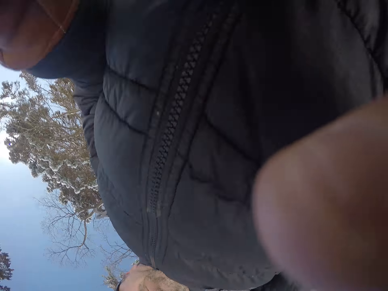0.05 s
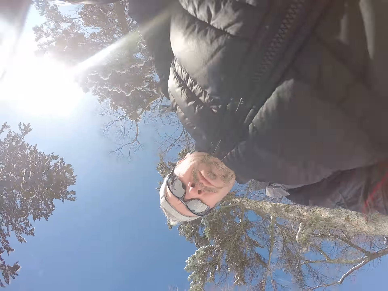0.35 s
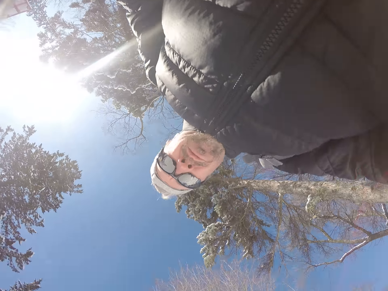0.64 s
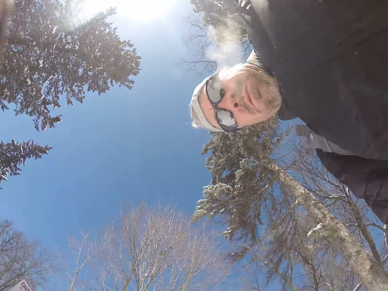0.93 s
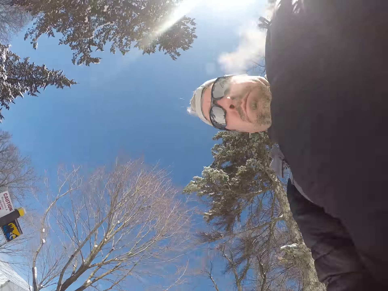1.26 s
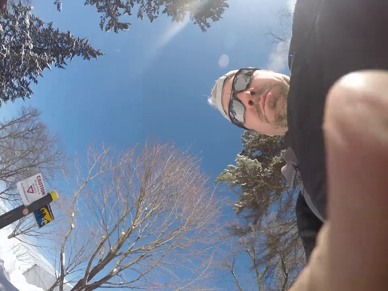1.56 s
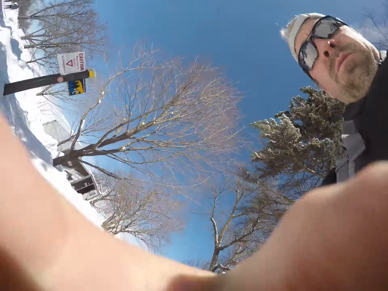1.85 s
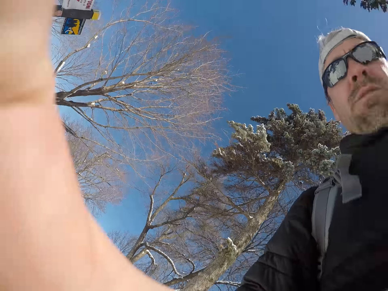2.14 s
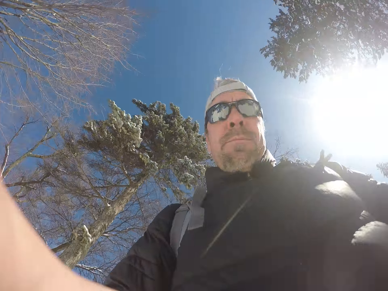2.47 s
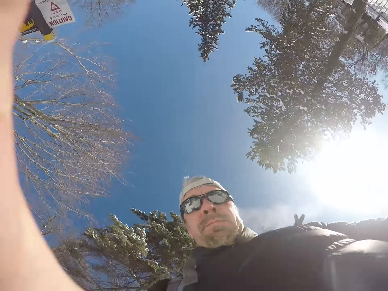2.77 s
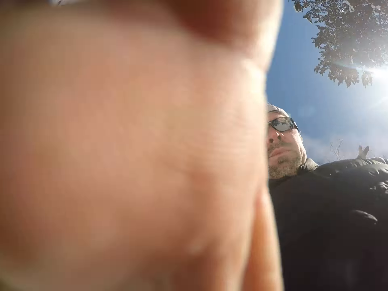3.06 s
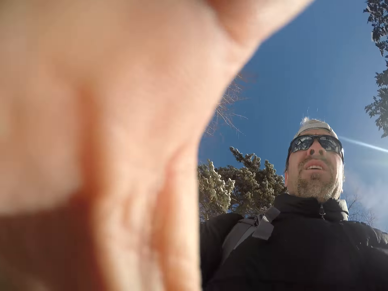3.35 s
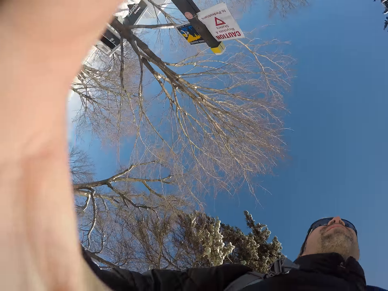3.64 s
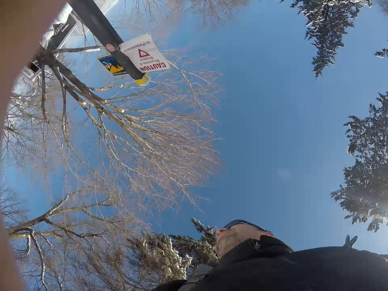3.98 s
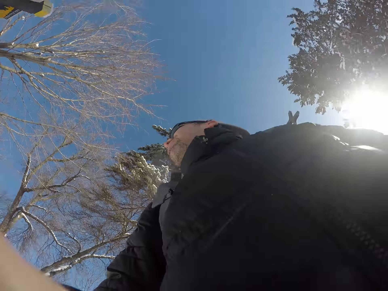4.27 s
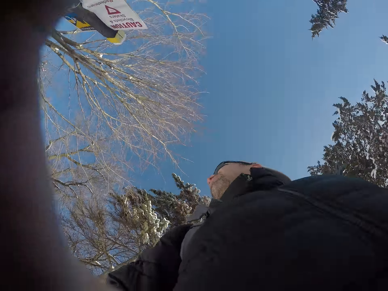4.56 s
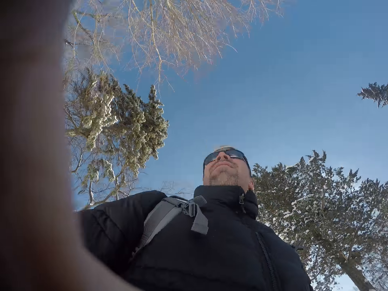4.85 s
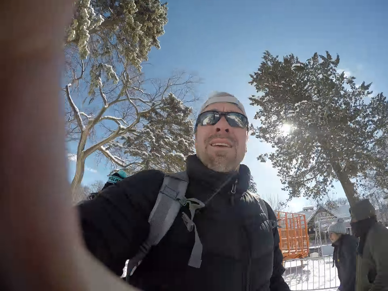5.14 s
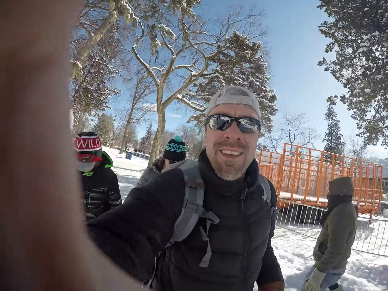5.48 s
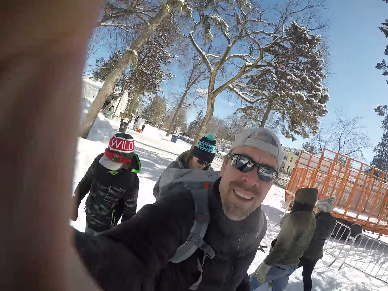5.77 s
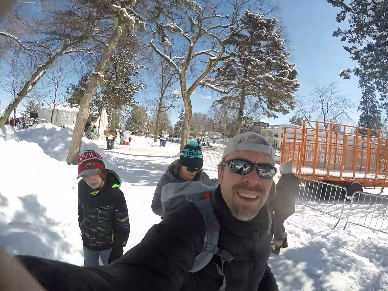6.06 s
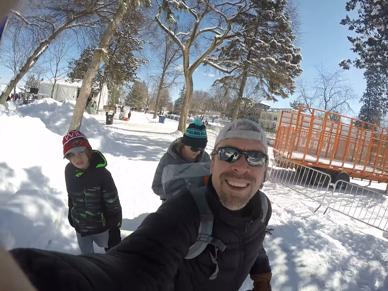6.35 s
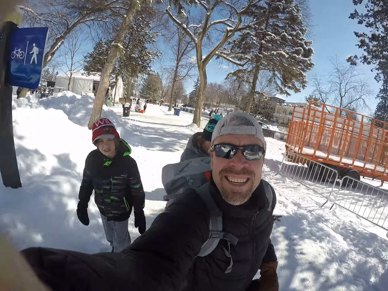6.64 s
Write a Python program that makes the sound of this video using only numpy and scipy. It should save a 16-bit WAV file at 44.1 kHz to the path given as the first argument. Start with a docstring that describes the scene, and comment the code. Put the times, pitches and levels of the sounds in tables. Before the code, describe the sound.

Close, dry handling noise leads throughout: fingers and jacket fabric rub, knock and squeak on a camera case, and each shove thumps the microphone. Softer, irregular footsteps crunch through packed snow outdoors, with a lumpy wind rumble below. The scraping is strongest around the middle, where a few dull fingertip pops come in. It then thins out and finishes with the case creaking in a tightened grip.

```python
"""Outdoors on packed snow: someone walks while turning a small camera over in one hand.
Wind rumbles at the microphone; the snow breaks under the boots in clumps of small cracks.
Skin and a padded jacket rub, squeak and knock on the case; each shove thumps the microphone.
A shifting fingertip pops dully, and at the end the case creaks in the tightened grip."""
import sys
import numpy as np
from scipy import signal
from scipy.fft import rfft, irfft
from scipy.io import wavfile
from scipy.ndimage import uniform_filter1d

SR = 44100
rng = np.random.default_rng(int(sys.argv[2]) if len(sys.argv) > 2 else 0)


def persist_wave(psi):
    """Save psi, clipped to +-1, as 16-bit WAV."""
    counts = np.round(np.clip(psi, -1, 1) * 32767).astype(np.int16)
    wavfile.write(sys.argv[1], SR, np.atleast_2d(counts).T)


N = 295894
TIME_S = np.arange(N) / SR
FREQS_HZ = np.fft.rfftfreq(4096, 1 / SR)

# camera shell response to knocks and squeaks: f/Hz, relative level/dB
SHELL_SPECTRUM = [(100, 9.5), (450, -5.5), (1000, -0.5), (1800, 0.5), (4100, -2.5), (4700, -10.5),
                  (5500, -17), (11000, -19.5), (15000, -31)]


def gain_of(db):
    """Decibels to amplitude."""
    return 10 ** (np.asarray(db) / 20)


def unit_rms(x):
    """Scale to rms 1."""
    return x / np.sqrt(np.mean(x ** 2) + 1e-20)


def unit_peak(x):
    """Scale to peak 1."""
    return x / (abs(x).max() + 1e-20)


def spectrum_db(points, hz=FREQS_HZ):
    """Spectrum interpolated on a log-frequency axis."""
    points_hz, db = np.transpose(points)
    return np.interp(np.log(hz + 1), np.log(points_hz), db)


def curve_db(points):
    """Level curve interpolated at every sample."""
    times_s, db = np.transpose(points)
    return np.interp(TIME_S, times_s, db)


def add(mix, start_s, sound):
    """Add a sound to the mix in place."""
    part = mix[max(round(start_s * SR), 0):][:len(sound)]
    part += sound[:len(part)]


def resonance_db(hz, width_hz, lift_db):
    """Bell-shaped lift over frequency."""
    return lift_db / (1 + (2 * (FREQS_HZ - hz) / width_hz) ** 2)


def colour(x, db):
    """Minimum-phase filter with the given gain over frequency."""
    log_gain = np.log(gain_of(np.r_[db, db[-2:0:-1]]))
    response = np.exp(np.conj(signal.hilbert(log_gain)))
    taps = np.fft.ifft(response).real
    return signal.oaconvolve(x, taps[:len(FREQS_HZ)])[:len(x)]


def wander(corner_hz):
    """Low-passed noise, rms 1."""
    hz = np.fft.rfftfreq(N, 1 / SR)
    return unit_rms(irfft(rfft(rng.standard_normal(N)) / (1 + (hz / corner_hz) ** 2), N))


def grains(per_s, spread_db):
    """Random impulses, rms 1; with spread, many small and a few large."""
    size = gain_of(spread_db * np.minimum(rng.exponential(1, N), 4))
    return unit_rms(size * rng.choice([-1, 1], N) * (rng.random(N) < per_s / SR))


def contact(length_s, attack_s, release_s):
    """Time axis and trapezoid envelope of one contact."""
    t = np.arange(0, length_s, 1 / SR)
    return t, np.clip(np.minimum(t / attack_s, (length_s - t) / release_s), 0, 1)


def moving_contact(x, depth_db):
    """The contact spot moves, so patches of the spectrum swell and fade; output rms 1."""
    frames = signal.stft(x, nperseg=512, noverlap=384)[2]
    patches = rng.standard_normal(frames.shape)
    for _ in range(2):
        patches = uniform_filter1d(patches, size=4, axis=0)
        patches = uniform_filter1d(patches, size=14, axis=1)
    frames = frames * gain_of(depth_db * unit_rms(patches))
    return unit_rms(signal.istft(frames, nperseg=512, noverlap=384)[1][:N])


def wind(rub_level, trim_db=4, lump_db=2.4, swing_db_per_db=0.17):
    """Lumpy turbulence at the microphone port, stronger as the hand swings the camera."""
    # t/s, level before trim and swing/dB
    strength = [(0.0, -37), (0.95, -29), (1.9, -30), (2.35, -32.5), (2.9, -23.5), (3.15, -25.5),
                (3.3, -33.5), (3.75, -24.5), (4.25, -22), (4.65, -24), (4.98, -29), (5.7, -27.5),
                (6.35, -26), (6.48, -32.5)]
    # f/Hz, relative level/dB
    gust_spectrum = [(8, -7.5), (24, 4), (35, -5), (65, -8.5), (110, -20), (200, -33.5), (400, -37),
                     (3000, -66)]
    eddies = rng.standard_normal(N) * gain_of(lump_db * wander(corner_hz=27))
    response = gain_of(spectrum_db(gust_spectrum, np.fft.rfftfreq(N, 1 / SR)))
    rumble = irfft(rfft(eddies) * response, N)
    swing = unit_rms(uniform_filter1d(rub_level, size=2000)) ** swing_db_per_db
    return gain_of(curve_db(strength) + trim_db) * swing * unit_rms(rumble)


def boot_load(fade_db=9):
    """Crunch amplitude: the snow gives under each boot, then firms up."""
    # shuffling between steps: t/s, relative level/dB
    shuffle = [(0.5, -56), (1.05, -42), (1.6, -40), (2.1, -49.5), (2.6, -43.5), (3.6, -45), (5.0, -56),
               (5.4, -50), (6.7, -54)]
    # boots pressing in: start/s, length/s, relative level/dB
    presses = [(0.667, 0.18, -35.5), (0.929, 0.093, -31.5), (1.071, 0.083, -33), (1.187, 0.24, -35),
               (1.525, 0.14, -36), (2.441, 0.063, -30), (2.658, 0.043, -29.5), (2.846, 0.127, -35),
               (2.994, 0.095, -32), (3.229, 0.017, -31), (3.687, 0.024, -30), (3.755, .07, -28),
               (3.98, 0.13, -36), (4.283, 0.066, -31), (4.531, 0.084, -36), (4.736, 0.072, -31.5),
               (5.195, 0.077, -42.5), (5.418, 0.098, -40), (5.819, 0.047, -33), (5.872, 0.058, -30.5),
               (6.033, 0.12, -36), (6.318, 0.03, -37.5)]
    power = gain_of(curve_db(shuffle)) ** 2
    for start_s, length_s, db in presses:
        t, load = contact(length_s, attack_s=0.0074, release_s=0.0065)
        add(power, start_s, (load * gain_of(db - fade_db * t / length_s)) ** 2)
    return np.sqrt(power)


def snow_crunch(trim_db=4.5, clump_db=1.5):
    """Packed snow breaks under the boots in clumps of small cracks."""
    # f/Hz, relative level/dB
    snow_spectrum = [(100, 1), (250, -4), (520, -10), (750, 1.5), (1100, -2), (1500, 1.5), (2200, -5),
                     (4000, -13.5), (9000, -32)]
    cracks = grains(per_s=1000, spread_db=2.5) * gain_of(clump_db * wander(corner_hz=61))
    crunch = moving_contact(colour(cracks, spectrum_db(snow_spectrum)), depth_db=1)
    return boot_load() * gain_of(trim_db) * crunch


def fingertip_pops(start_hz=1000, end_hz=65, fall_s=0.003, decay_s=0.006):
    """Each pop drops in pitch and grows fuller as the fingertip settles."""
    # t/s, peak/dB
    pops = [(4.114, -24), (4.178, -22), (4.212, -20.5), (4.826, -31.5), (5.214, -31), (5.263, -27.5),
            (5.299, -30), (5.352, -26)]
    out, t = np.zeros(N), TIME_S[:SR // 10]
    hz = end_hz + (start_hz - end_hz) * np.exp(-t / fall_s)
    glide = np.sin(2 * np.pi * np.cumsum(hz) / SR)
    pop = unit_peak(glide * np.exp(-t / decay_s) / hz)
    for start_s, db in pops:
        add(out, start_s, gain_of(db) * pop)
    return out


def case_creak():
    """Strained plastic lets go in single ticks, all ringing alike."""
    # t/s, peak/dB
    slips = [(6.488, -21.5), (6.508, -17.5), (6.517, -20), (6.529, -19), (6.5544, -22), (6.567, -16),
             (6.5838, -12.5), (6.607, -18), (6.659, -15.5)]
    # f/Hz, relative level/dB, T60/s
    modes = [(1250, 10, 0.0049), (1770, 12, 0.0036), (2430, 4.5, 0.0087), (3130, 2.5, 0.0071),
             (3850, -4.5, 0.012), (5430, -11, 0.004)]
    out, t = np.zeros(N), TIME_S[:SR // 20]
    tick = sum((-1) ** k * gain_of(db - 60 * t / t60_s) * np.sin(2 * np.pi * hz * t)
               for k, (hz, db, t60_s) in enumerate(modes))
    for start_s, db in slips:
        add(out, start_s, gain_of(db) * unit_peak(tick))
    return out


def air_thumps(fade_cycles=0.28, sag_cycles=1.0):
    """A shove pushes air into the microphone; the pressure swing slows as it dies."""
    # t/s, peak/dB, initial f/Hz
    shoves = [(0.699, -12.5, 98), (0.915, -16.5, 52), (1.307, -3.5, 29.5), (1.396, -13, 42.3),
              (1.559, -13, 164), (1.583, -2.5, 68.5), (1.698, -11.5, 77), (1.823, -25, 165),
              (2.103, -5, 98), (2.454, -12.5, 55), (2.682, -12, 73), (3.05, -11.5, 115), (3.438, -1, 94),
              (4.126, -9, 51.6), (4.18, -13, 48), (4.391, -9, 75), (4.474, -0.5, 94), (4.83, -17, 45),
              (5.535, -13.5, 33), (5.712, -13.5, 50.5)]
    out, t = np.zeros(N), TIME_S[:SR // 5]
    for start_s, db, hz in shoves:
        cycles = hz * t
        swing = np.sin(2 * np.pi * sag_cycles * np.log1p(cycles / sag_cycles))
        envelope = cycles ** 2 * np.exp(-cycles / fade_cycles)
        add(out, start_s, gain_of(db) * unit_peak(swing * envelope))
    return out


def skin_squeaks(relative_width=0.34, lift_db=25):
    """Skin sticks and slips, locking briefly on to one resonance: bright scuffs to short squeaks."""
    # centre/s, rms at centre/dB, f/Hz, length/s
    squeaks = [(0.15, -34, 3900, 0.061), (0.483, -28, 3900, 0.036), (2.869, -23, 4160, 0.059),
               (2.957, -15.5, 1820, .03), (3.004, -16, 2220, 0.011), (3.029, -17, 2380, 0.039),
               (3.21, -26, 1820, 0.24), (3.436, -10, 1700, 0.00897), (3.559, -29.5, 3400, .07),
               (3.799, -10.5, 2040, 0.012), (3.80, -18, 3580, 0.012), (3.835, -10, 1970, 0.0061),
               (4.062, -29, 3970, 0.11), (4.362, -14, 1920, 0.033), (4.605, -15, 1770, 0.012),
               (5.584, -33.5, 3200, .1), (5.885, -21.5, 1450, 0.032)]
    out = np.zeros(N)
    for centre_s, db, hz, length_s in squeaks:
        shell_db = spectrum_db(SHELL_SPECTRUM) + resonance_db(hz, relative_width * hz, lift_db)
        chatter = colour(rng.standard_normal(SR), shell_db)
        arch = np.sqrt(signal.windows.hann(int(length_s * SR)))
        add(out, centre_s - length_s / 2, gain_of(db) * unit_rms(chatter[-len(arch):]) * arch)
    return out


def through_case(x, db):
    """Colour a sound and let it ring in the camera case."""
    # f/Hz, width/Hz, lift/dB
    modes = [(1640, 95, 2), (1900, 125, 3), (2505, 71, 3.5), (3410, 360, 2.5), (3900, 770, -2.5)]
    return colour(x, db + sum(resonance_db(*mode) for mode in modes))


def finger_knocks(rattle_gain=0.5, relative_width=0.74, lift_db=12):
    """A sharp contact and a brief rattle; the spot hit favours one band of the shell."""
    # t/s, peak/dB, favoured f/Hz, rattle decay/s
    knocks = [(0.929, -9, 2470, 0.0033), (1.248, -7.5, 2700, 0.0028), (1.305, -5.5, 1480, 0.0036),
              (1.588, 2.5, 4130, 0.0011), (1.696, -8.5, 4550, 0.0023), (2.102, -5.5, 2620, 0.00025),
              (2.102, -21, 1170, 0.0037), (2.615, -8, 2430, 0.00092), (3.061, -7, 1300, 0.0012),
              (3.077, -2, 1280, 0.0017), (3.389, -10, 2210, 0.0017), (3.394, -11, 2020, 0.00079),
              (3.428, -11, 960, 0.0032), (3.433, -1.5, 9500, 0.0032), (4.132, -1.5, 1160, 0.0018),
              (4.213, -13, 1850, 0.0013), (4.57, 1, 2670, 0.0011), (4.593, -10, 1330, 0.00071),
              (4.599, -11.5, 800, 0.0049), (4.801, -26, 1380, 0.0031), (5.541, -17.5, 6500, 0.0026),
              (5.608, -13.5, 1280, 0.0024), (5.675, -9, 1250, 0.00073), (5.676, -2, 3580, 0.00073),
              (5.700, -9, 1540, 0.0022), (6.05, -15, 1380, 0.015)]
    out, t = np.zeros(N), TIME_S[:len(FREQS_HZ)]
    impulse = t == 0
    for start_s, db, hz, decay_s in knocks:
        rattle = rattle_gain * rng.standard_normal(len(t)) * np.exp(-t / decay_s)
        shell_db = spectrum_db(SHELL_SPECTRUM) + resonance_db(hz, relative_width * hz, lift_db)
        add(out, start_s, gain_of(db) * unit_peak(through_case(impulse + rattle, shell_db)))
    return out


def hand_strokes(swell_db=7.5, fizz_swell_db=5, crest_exponent=0.82, fidget_db=2.34, grip_fizz_db=-14.5):
    """Rub and fizz amplitudes: each stroke speeds up and slows, louder and brighter with speed."""
    # faint rub of the shifting grip: t/s, level/dB
    grip = [(0.0, -41.5), (0.45, -39.5), (0.8, -28.5), (0.875, -40), (1.0, -40), (1.72, -32.5), (2.02, -39),
            (2.55, -38.5), (2.99, -28.5), (3.46, -28.5), (3.87, -41), (4.0, -33), (4.55, -27.5),
            (4.83, -45), (5.05, -49.5), (5.75, -42.5), (6.46, -45), (6.71, -60)]
    # start/s, length/s, rub at full speed/dB, fizz re rub before trim/dB, fastest point/fraction
    strokes = [(0.0, 0.04, -28, -15, 0), (0.124, 0.14, -28.5, -10, 0), (0.255, 0.15, -23.5, -5, 0.55),
               (0.47, 0.056, -27.5, -7.5, 0.12), (0.528, 0.11, -21, -3.5, 0.48),
               (0.679, 0.13, -17.5, -9.5, 0.74), (0.904, 0.15, -27.5, -15.5, 0.24),
               (1.047, 0.1, -26.5, -39, 0.22), (1.14, 0.11, -25.5, -15.5, 0.74),
               (1.252, 0.096, -25.5, -9.5, 0.8), (1.362, 0.089, -25, -8, 0.58),
               (1.501, 0.16, -21.5, -5, 0.52), (1.668, 0.065, -26, 2, 0.47),
               (1.755, 0.11, -25.5, -1.5, 0.45), (1.865, 0.042, -26.5, 1.5, 0.27),
               (1.952, 0.056, -32, 6.5, 0.56), (2.052, 0.11, -30.5, -4.5, 0.42),
               (2.144, 0.091, -28.5, -4, 0.36), (2.234, 0.14, -31.5, -5, 0.3),
               (2.437, 0.074, -23, -18.5, 0.68), (2.555, 0.097, -22.5, -5.5, 0.83),
               (2.843, 0.064, -19.5, -9, 0.3), (2.878, 0.1, -19.5, -0.5, 0.81),
               (2.997, 0.13, -17, -5.5, 0.34), (3.093, 0.33, -21, -12, 0.17),
               (3.518, 0.23, -23.5, -8, 0.42), (3.757, 0.1, -22, -9.5, 0.4), (3.898, 0.09, -22, -8, 0.71),
               (4.007, 0.17, -25.5, -4.5, 0.27), (4.224, 0.16, -23.5, -7, 0.8),
               (4.337, 0.045, -13.5, -4.5, 0.37), (4.368, 0.051, -14, -8.5, 0.46),
               (4.438, 0.046, -15, -6.5, 0.78), (4.576, 0.15, -25, -8, 0), (4.715, 0.067, -26, -7, 0.37),
               (4.983, 0.035, -41, -16, 0.2), (5.409, 0.12, -36.5, -11, 0.67),
               (5.522, 0.12, -32, -9.5, 0.84), (5.649, 0.079, -25, -12.5, 0.56),
               (5.797, 0.1, -33, 2.5, 0.75), (5.826, 0.084, -18.5, -9.5, 0.68),
               (5.901, 0.14, -30, -10, 0.26), (6.044, 0.11, -29.5, -9.5, 0.1),
               (6.203, 0.16, -35.5, -10, 0.13), (6.561, .11, -60.5, 11.5, 0.06)]
    rub_power = gain_of(curve_db(grip) + fidget_db * wander(corner_hz=23)) ** 2
    fizz_power = rub_power * gain_of(grip_fizz_db) ** 2
    for start_s, length_s, db, fizz_db, fastest in strokes:
        t, touch = contact(length_s, attack_s=0.0027, release_s=0.011)
        slowness = np.interp(t / length_s, [0, np.clip(fastest, 0.05, 0.95), 1], [1, 0, 1])
        level = touch * gain_of(db - swell_db * slowness ** crest_exponent)
        add(rub_power, start_s, level ** 2)
        add(fizz_power, start_s, (level * gain_of(fizz_db - fizz_swell_db * slowness)) ** 2)
    return np.sqrt(rub_power), np.sqrt(fizz_power)


def case_rubbing(rub_level, fizz_level, judder_db=0.78, fizz_trim_db=-0.83):
    """Skin and nylon slide on the case: a rasp, a fizz above it, a low drag through the body."""
    # each: f/Hz, relative level/dB
    rasp_spectrum = [(150, -28.5), (500, -31.5), (900, -21), (1300, -9), (1800, -1), (2200, -4), (2600, -1),
                     (3200, -5), (4150, -4.5), (4700, -25.5), (6500, -25.5), (15000, -72)]
    fizz_spectrum = [(2500, -34), (4500, -1), (5600, 4), (6500, -1.5), (7900, 4), (9000, 1), (10400, -1),
                     (11800, -7.5), (13300, -9.5), (15000, -8.5)]
    drag_spectrum = [(30, -3.5), (120, 1.5), (270, -7), (500, -25), (2000, -47)]
    # hand pressure: t/s, drag re rasp/dB
    pressure = [(.6, -19), (1.2, -12), (1.58, -6), (3.05, -8.5), (3.3, -17.5), (3.7, -13), (4.3, -13.5),
                (5.9, -21)]
    slips = grains(per_s=11000, spread_db=0) * gain_of(judder_db * wander(corner_hz=106))
    rasp = moving_contact(through_case(slips, spectrum_db(rasp_spectrum)), depth_db=3)
    noisy_slips = slips + 0.78 * rng.standard_normal(N)
    fizz = moving_contact(colour(noisy_slips, spectrum_db(fizz_spectrum)), depth_db=2.25)
    coarse_slips = grains(per_s=300, spread_db=3)
    drag = gain_of(curve_db(pressure)) * unit_rms(colour(coarse_slips, spectrum_db(drag_spectrum)))
    return rub_level * (rasp + drag) + fizz_level * gain_of(fizz_trim_db) * fizz


def scene():
    """Mono, close and dry: open snow gives no echo."""
    rub_level, fizz_level = hand_strokes()
    handling = case_rubbing(rub_level, fizz_level) + finger_knocks() + skin_squeaks()
    handling += air_thumps() + fingertip_pops() + case_creak()
    return (handling + snow_crunch() + wind(rub_level))[None]


def record(dry, low_cut_hz=6, ceiling=0.92, high_cut_hz=15500):
    """Microphone: blocks steady pressure, rounds off the loudest peaks, limits the band."""
    x = signal.sosfilt(signal.butter(1, low_cut_hz, "highpass", fs=SR, output="sos"), dry)
    limited = x / (1 + (x / ceiling) ** 8) ** (1 / 8)
    lowpass = signal.firwin(511, high_cut_hz, window=("kaiser", 9), fs=SR)
    return signal.oaconvolve(limited, lowpass[None], "same")


dry = scene()
out = record(dry)
persist_wave(out)
```